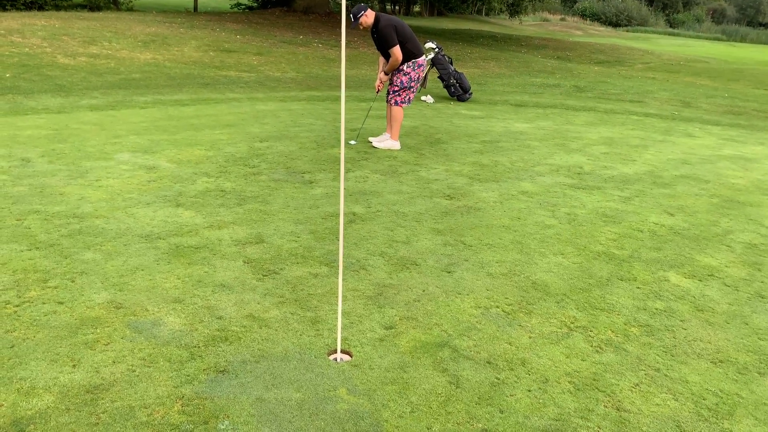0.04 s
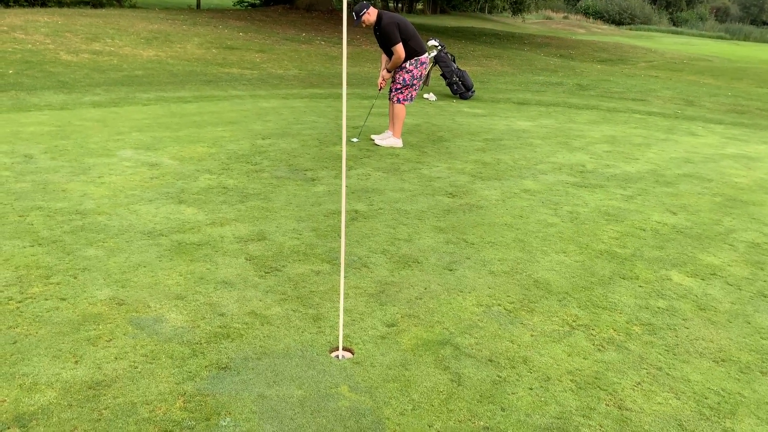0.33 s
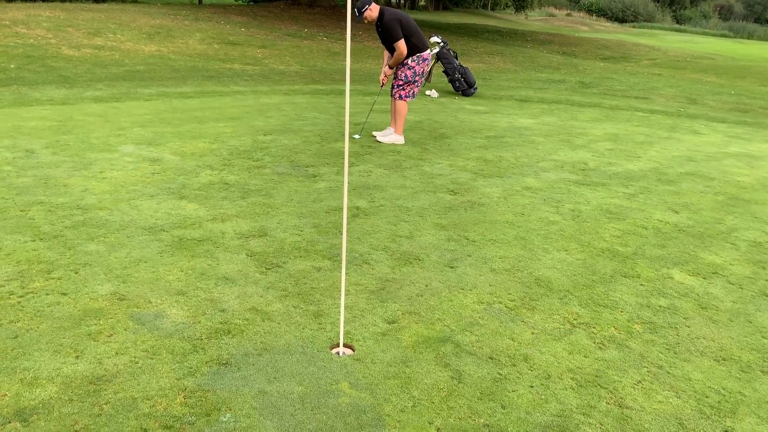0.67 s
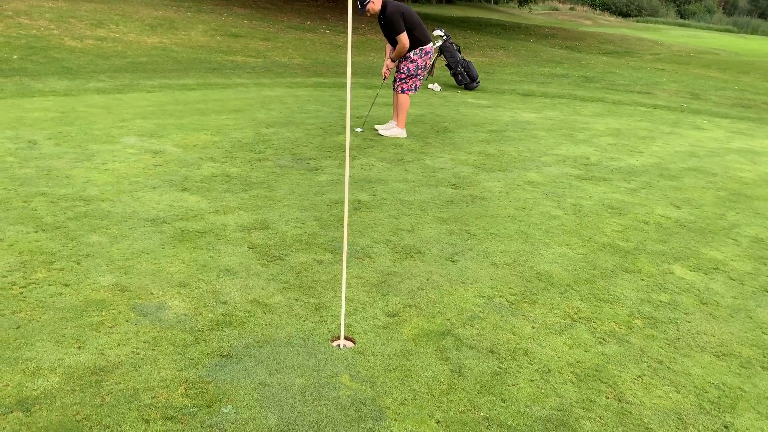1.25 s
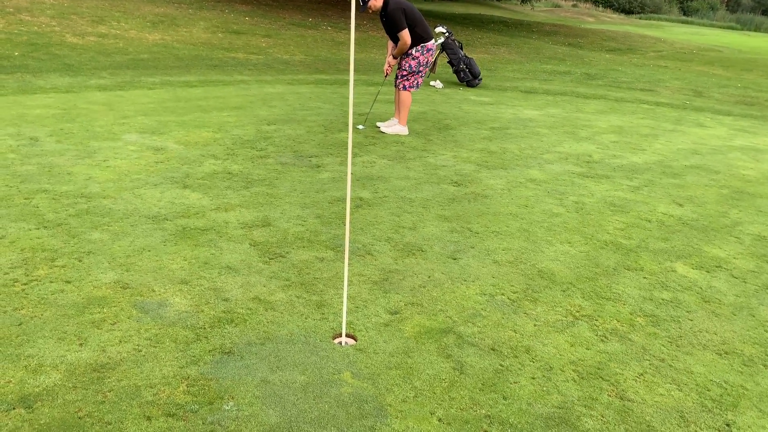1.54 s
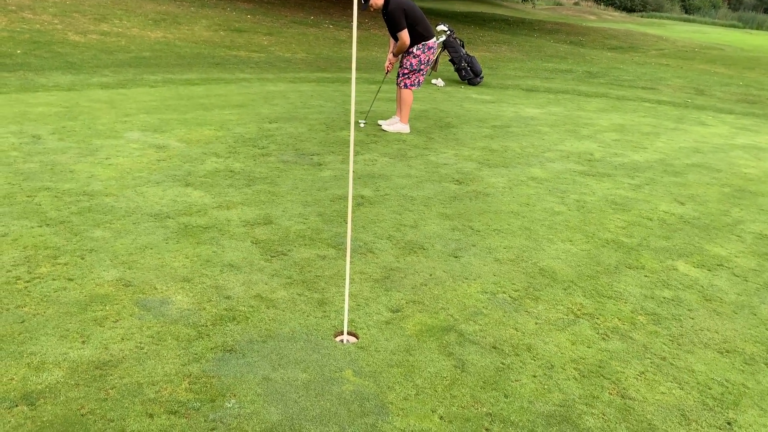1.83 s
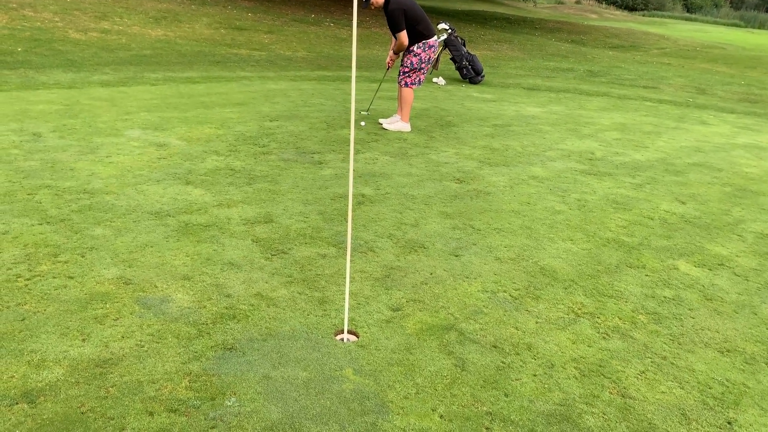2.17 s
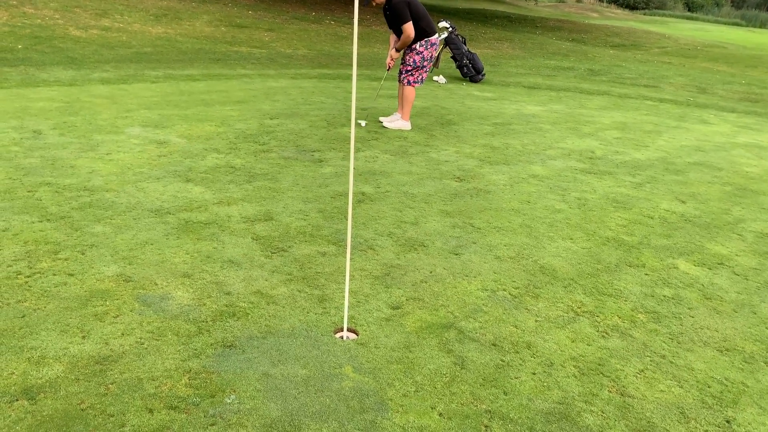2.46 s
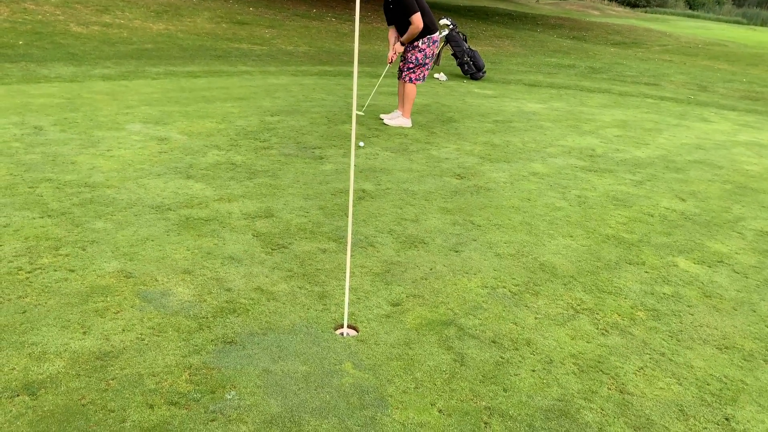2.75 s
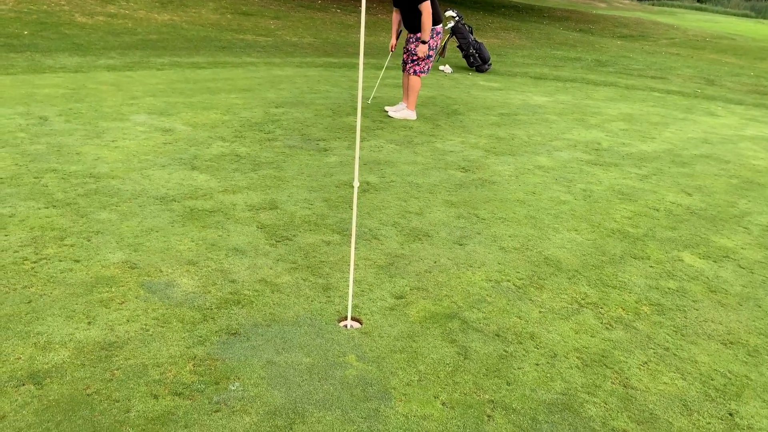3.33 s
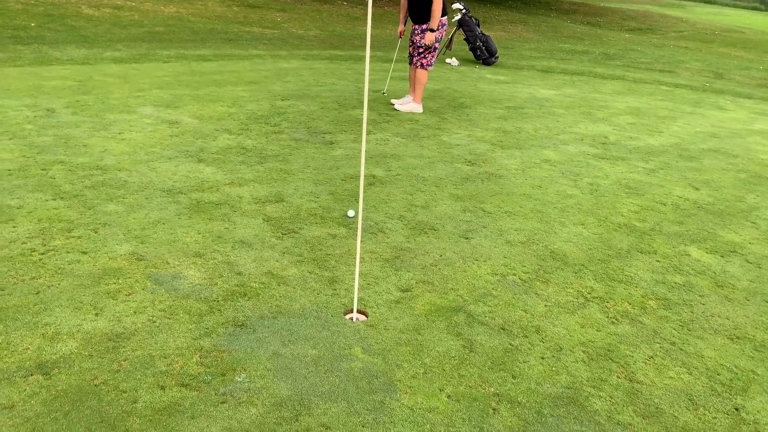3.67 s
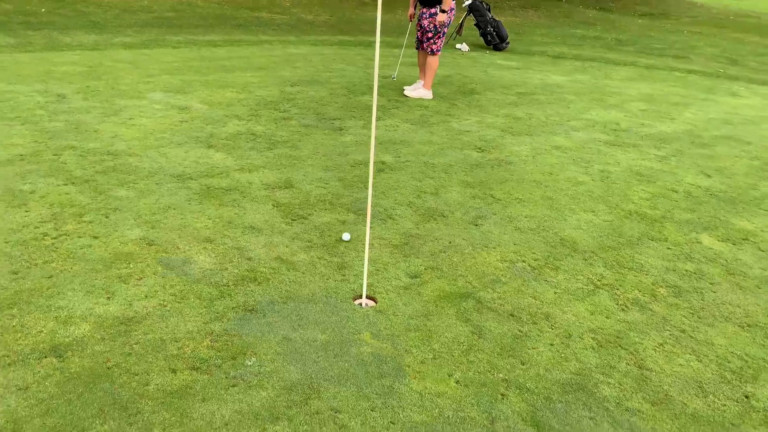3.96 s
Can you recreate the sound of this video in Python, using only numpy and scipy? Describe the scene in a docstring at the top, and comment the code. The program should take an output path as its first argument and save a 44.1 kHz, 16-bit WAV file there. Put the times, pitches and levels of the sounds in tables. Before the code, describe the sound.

A putter hits a golf ball with one sharp click at about 2.5 seconds, a few metres away, leaving a faint outdoor echo. Soft handling bumps and tiny ticks come on the hand-held microphone from around 0.4 seconds, with the strongest thump near 2.8 seconds. Light wind rumbles throughout, swelling slightly before 1 second and near 3.8 seconds, over a faint distant hush and hiss.

```python
"""One sharp click of a putter on a golf ball sounds a few metres away on an open green.
The impact excites the damped modes of ball and putter head, and the trees return a faint echo.
Soft handling bumps and light wind thud on a hand-held microphone, whose bass arrives late,
so every knock droops in pitch. Behind lie faint bird peeps, a distant hush and microphone hiss."""
import sys
import numpy as np
from scipy import signal
from scipy.fft import rfft, irfft, next_fast_len
from scipy.io import wavfile
from scipy.ndimage import uniform_filter1d, map_coordinates

SR = 44100
rng = np.random.default_rng(int(sys.argv[2]) if len(sys.argv) > 2 else 0)


def dump_mix(stems):
    """Bounce the given channels to the path in sys.argv[1] as a 16-bit WAV at rate SR."""
    frames = np.atleast_2d(stems).T  # one column per channel
    limited = np.clip(frames, -1, 1)  # hard clip at full scale
    pcm = np.round(limited * 32767).astype(np.int16)
    wavfile.write(sys.argv[1], SR, pcm)


N = 176400

# Modes of ball and putter head: f/Hz, T60/s, relative level/dB, left minus right/dB
PUTT_MODES = [(3910, 0.016, -21.5, 11), (4300, 0.0052, -23.5, 6), (5280, 0.0078, -28, 14),
              (6350, .005, -32, -13), (7860, 0.0084, -26, 3.5), (8500, 0.0047, -28.5, 2.5),
              (11200, 0.0042, -44.5, 0), (12550, .003, -38, -10.5), (14250, 0.0057, -29.5, 2)]
# Spectrum of the contact pulse: f/Hz, relative level/dB
CONTACT_SPECTRUM = [(100, -16), (280, -5), (500, -13), (750, -8.5), (1150, 1.5), (1500, -9), (1850, -10),
                    (2150, -19), (2500, -37), (3300, -47), (8000, -87)]
# Stereo balance of the contact pulse: f/Hz, left minus right/dB
CONTACT_PAN = [(500, 18), (1150, 3), (1700, 12), (2600, 6.5)]
# Spectrum of the echo from the trees: f/Hz, relative level/dB
ECHO_SPECTRUM = [(300, -22), (1100, 3), (1900, 1.5), (2700, -13), (3400, -11), (3800, -0.5), (4400, -9.5),
                 (5400, -8.5), (6800, -17), (7800, -7), (9000, -12.5), (14000, -26)]
# Handling bumps: t/s, pulse level/dB, corner f/Hz
BUMPS = [(.426, -35.5, 271), (.439, -29, 72.6), (.622, -34, 99), (.668, -30.5, 75), (.703, -28.5, 154),
         (0.759, -29, 119), (0.779, -32, 170), (0.824, -38, 101), (0.905, -26.5, 185), (.93, -26.5, 110),
         (1.279, -31, 97), (1.356, -33, 137), (1.615, -37, 80), (1.983, -33, 60), (2.339, -30, 188),
         (2.414, -33, 70), (2.727, -36, 100), (2.742, -31, 260), (2.757, -32.5, 200), (2.774, -14.5, 278),
         (2.805, -38, 200), (2.8455, -28, 229), (2.851, -19, 60), (2.923, -32, 213), (2.953, -36.5, 194),
         (3.034, -35, 202), (3.052, -35, 89), (3.166, -31, 85), (3.47, -42, 174), (3.626, -45.5, 218),
         (3.937, -27.5, 70)]
# Ticks of the grip on the case: t/s, level before low-pass/dB, f/Hz
GRIP_TICKS = [(.903, -50.5, 746), (1.273, -46.5, 695), (1.599, -48.5, 1090), (1.622, -56, 930),
              (2.057, -53, 890), (2.842, -53.5, 790), (2.969, -48, 400), (3.033, -48.5, 712),
              (3.468, -58, 755), (3.626, -53, 554), (3.834, -52, 685)]
# Wind envelope: t/s, relative level/dB
WIND_LEVEL = [(0, -48.5), (.1, -50.5), (.5, -46), (.62, -39.5), (.93, -40), (1.06, -52.5), (1.3, -48.5),
              (1.42, -42), (1.5, -49), (1.8, -53), (2.3, -48), (2.57, -54), (2.8, -42.5), (3.1, -50),
              (3.35, -45.5), (3.62, -55.5), (3.83, -40), (4, -46)]
# Wind spectrum: f/Hz, relative level/dB
WIND_SPECTRUM = [(18, -36), (26, -18.5), (38, -3.5), (60, 4), (100, -3.5), (160, -15), (250, -25.5),
                 (400, -39.5), (800, -59), (2000, -100)]
# Bird peeps: t/s, duration/s, f/Hz, tone level/dB
PEEPS = [(1.205, 0.047, 4900, -88), (2.169, 0.1, 4230, -84)]
# Spectrum of a peep's airy edge: f/Hz, relative level/dB
PEEP_AIR = [(2500, -27), (4200, 2), (6200, -4), (8500, -8), (11000, -30)]
# Envelopes of the hush bands: t/s, then relative level/dB of low, middle and treble
HUSH_LEVELS = [(0, -72.5, -66, -81), (.25, -76.5, -66, -78.5), (.45, -78.5, -66.5, -80),
               (.85, -75.5, -67, -80), (1.02, -78, -69.5, -80), (1.2, -76.5, -69, -77.5),
               (1.38, -71, -66.5, -79.5), (1.62, -69, -65, -78.5), (1.9, -68.5, -65.5, -77.5),
               (2.1, -72.5, -65.5, -81), (2.35, -67, -67, -80.5), (2.55, -67, -66.5, -78.5),
               (2.72, -75, -67.5, -80.5), (2.9, -72.5, -71, -81.5), (3.12, -77, -71, -82),
               (3.25, -77.5, -70, -77), (3.6, -66.5, -67, -78.5), (3.75, -70, -68, -82.5),
               (4, -71.5, -63.5, -74.5)]
# Spectra of the low, middle and treble hush bands: f/Hz, relative level/dB
HUSH_LOW = [(30, -12), (200, -2.5), (310, 0), (450, -2), (560, -7.5), (750, -9), (1100, -29.5),
            (3000, -62.5)]
HUSH_MIDDLE = [(30, -28), (400, -20), (560, -6), (770, 2.5), (900, -.5), (1080, 0.5), (1300, -7.5),
               (1550, -18.5), (2000, -35.5), (5000, -66)]
HUSH_TREBLE = [(800, -40), (1300, -5.5), (1550, -0.5), (2000, -4.5), (2300, -11), (2700, -17), (5000, -26),
               (15000, -63.5)]
# Spectrum of the microphone's self-noise: f/Hz, relative level/dB
HISS_SPECTRUM = [(100, -15.5), (2500, -0.5), (4500, 3.5), (6500, -0.5), (7600, -1.5), (9000, 5),
                 (10500, 4.5), (11600, -10), (13000, 2.5), (15000, -8)]
# Stereo likeness of hush and hiss: f/Hz, left-right correlation/1
HUSH_CORRELATION = [(350, 1), (550, 0.57), (800, 0.055), (1100, -0.16), (2000, 0.3), (8000, .3)]
HISS_CORRELATION = [(2500, -0.08), (7000, -0.36), (9300, .8), (11500, -0.93), (14000, .8)]

PUTT_S = 2.4503
SIDES = np.array([[.5], [-.5]])  # splits a left-minus-right difference between the channels


def putt(contact_db=-27, ring_db=-24, radiation_hz=3550, left_lead_s=0.000098):
    """Impact excites a brief pulse and damped modes; small bodies radiate low frequencies poorly."""
    f = np.fft.rfftfreq(N, 1 / SR)
    colour = amp(along(CONTACT_SPECTRUM, f))
    balance = amp(SIDES * along(CONTACT_PAN, f))
    contact = irfft(colour * balance * np.exp(-2j * np.pi * f * PUTT_S), N) / colour.mean()
    modes = sum(amp(db + SIDES * pan) * ring(PUTT_S, hz, t60) for hz, t60, db, pan in PUTT_MODES)
    radiated = filtered(modes, lambda hz: 1 - lowpass(hz, radiation_hz, 8))
    click = amp(contact_db) * contact + amp(ring_db) * radiated
    # The click reaches the left port first; above 8800 Hz the group delays are equal.
    return filtered(click, lambda hz: np.exp(2j * np.pi * np.minimum(hz, 8800) * left_lead_s * SIDES))


def tree_echo(start_db=-73.5, t60=.55):
    """Scattering by the trees returns the click as diffuse, exponentially decaying noise."""
    t = since(PUTT_S)
    return stereo_noise(ECHO_SPECTRUM, [(1000, 0.0012)]) * amp(start_db - 60 * t / t60) * (t > 0)


def bump(s, corner_hz, bass_limit_hz=42):
    """A soft push is a band-limited pulse, here of peak 1; a higher corner makes it shorter."""
    hz = np.fft.rfftfreq(N, 1 / SR)
    band = (1 - lowpass(hz, bass_limit_hz, 5)) * np.sqrt(lowpass(hz, corner_hz, 6.6))
    gain = band / (1 + hz / bass_limit_hz) ** 0.55
    return irfft(gain * np.exp(-2j * np.pi * hz * s), N) / gain.mean()


def handling():
    """Structure-borne sound carries finger bumps and ticks on the case equally to both channels."""
    bumps = sum(amp(db) * bump(s, hz) for s, db, hz in BUMPS)
    ticks = sum(amp(db) * ring(s, hz, t60=0.023) for s, db, hz in GRIP_TICKS)
    return bumps + filtered(ticks, lambda hz: lowpass(hz, 1400, 6))


def wind(gain_db=-1, flutter_db=2.5):
    """Turbulent pressure at the microphone makes a fluttering mono rumble."""
    rumble = unit(filtered(rng.standard_normal(N), lambda hz: amp(along(WIND_SPECTRUM, hz))))
    return rumble * amp(curve(WIND_LEVEL) + gain_db + flutter_db * wobble(14))


def bird(air_db=-1.5):
    """Random phase modulation makes each far-off peep waver; noise gives it an airy edge."""
    air = amp(air_db) * stereo_noise(PEEP_AIR, [(1000, .5)])
    peeps = np.zeros((2, N))
    for s, length, hz, db in PEEPS:
        t = since(s)
        swell = np.sin(np.pi * np.minimum(t / length, 1)) ** 2
        tone = np.sin(2 * np.pi * hz * t + .8 * wobble(120))
        peeps += amp(db) * swell * (tone + air)
    return peeps


def hush():
    """Slow amplitude modulation of three noise bands makes a wide, distant hush swell and sink."""
    s, low_db, middle_db, treble_db = np.transpose(HUSH_LEVELS)

    def band(spectrum, db, pan_db):
        noise = stereo_noise(spectrum, HUSH_CORRELATION)
        return noise * amp(curve(np.c_[s, db]) + .7 * wobble(11) + SIDES * pan_db)

    low = band(HUSH_LOW, low_db + 3.5, pan_db=0)
    middle = band(HUSH_MIDDLE, middle_db + 1.5, pan_db=1)
    treble = band(HUSH_TREBLE, treble_db - 1.5, pan_db=3)
    return patches(low + middle + treble)


def hiss(level_db=-82):
    """The microphone's self-noise is stationary: its spectrum and level hold steady."""
    return amp(level_db) * stereo_noise(HISS_SPECTRUM, HISS_CORRELATION)


def amp(db):
    """Amplitude grows tenfold for every 20 dB."""
    return 10 ** (np.asarray(db) / 20)


def unit(x):
    """Normalisation brings the rms to 1."""
    return x / np.sqrt(np.mean(x ** 2) + 1e-20)


def along(points, hz):
    """Interpolation of (f/Hz, value) points on a logarithmic frequency axis."""
    f, v = np.transpose(points)
    return np.interp(np.log(hz + 1), np.log(f + 1), v)


def curve(rows):
    """Linear interpolation of (t/s, value) points at every sample."""
    return np.interp(np.arange(N) / SR, *np.transpose(rows))


def since(s):
    """Causal time: seconds since an onset, zero before it."""
    return np.maximum(np.arange(N) / SR - s, 0)


def wobble(rate):
    """Spline interpolation joins random knots, rate per second, into a smooth curve."""
    knots = rng.standard_normal(int(N * rate / SR) + 4)
    return map_coordinates(knots, [np.arange(N) * rate / SR])


def lowpass(hz, corner_hz, order):
    """Gain is one half at the corner and falls as a power law above it."""
    return 1 / (1 + (hz / corner_hz) ** order)


def filtered(x, response):
    """A linear filter multiplies the spectrum by its complex frequency response."""
    size = next_fast_len(N + SR // 2)
    return irfft(rfft(x, size) * response(np.fft.rfftfreq(size, 1 / SR)), size)[..., :N]


def ring(s, hz, t60):
    """A damped mode struck at time s loses 60 dB every t60 seconds."""
    t = since(s)
    return np.sin(2 * np.pi * hz * t) * np.exp(-np.minimum(np.log(1000) * t / t60, 50))


def stereo_noise(spectrum, correlation):
    """The ratio of mid to side power sets the left-right correlation of coloured noise of rms 1."""
    def response(hz):
        angle = np.arccos(np.clip(along(correlation, hz), -1, 1)) / 2
        return amp(along(spectrum, hz)) * [np.cos(angle), np.sin(angle)]

    mid, side = filtered(rng.standard_normal((2, N)), response)
    return unit(np.array([mid + side, mid - side]))


def patches(x, depth_db=2):
    """Smooth random gain modulates the short-time spectrum in patches of time and frequency."""
    spectra = signal.stft(x, nperseg=2048)[2]
    field = uniform_filter1d(rng.standard_normal(spectra.shape[1:]), size=4, axis=0)
    field = uniform_filter1d(field, size=5, axis=1)
    return signal.istft(spectra * amp(depth_db * unit(field)), nperseg=2048)[1][:, :N]


def scene():
    """By superposition, the sources add at the microphone."""
    return putt() + tree_echo() + handling() + wind() + bird() + hush() + hiss()


def record(dry):
    """The band-limited microphone folds bass to mono and is dispersive: low frequencies arrive late."""
    mono_below_hz, top_hz, delay_cycles = 750, 15750, 1.1
    mid = dry.mean(axis=0)
    side = filtered(dry - mid, lambda hz: 1 - lowpass(hz, mono_below_hz, 5))
    dispersion = lambda hz: np.exp(-2j * np.pi * delay_cycles * np.log(hz + 10))
    return filtered(mid + side, lambda hz: dispersion(hz) * (hz < top_hz))


dry = scene()
out = record(dry)
dump_mix(out)
```